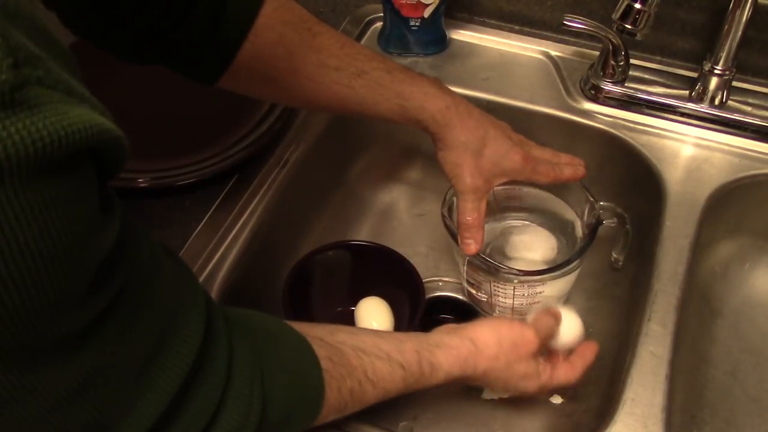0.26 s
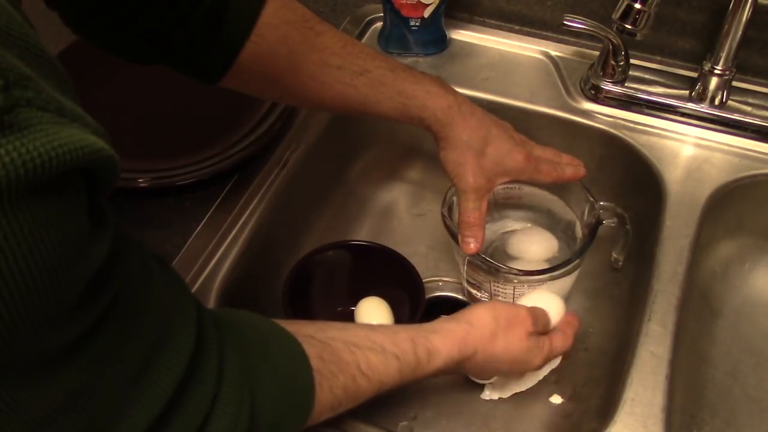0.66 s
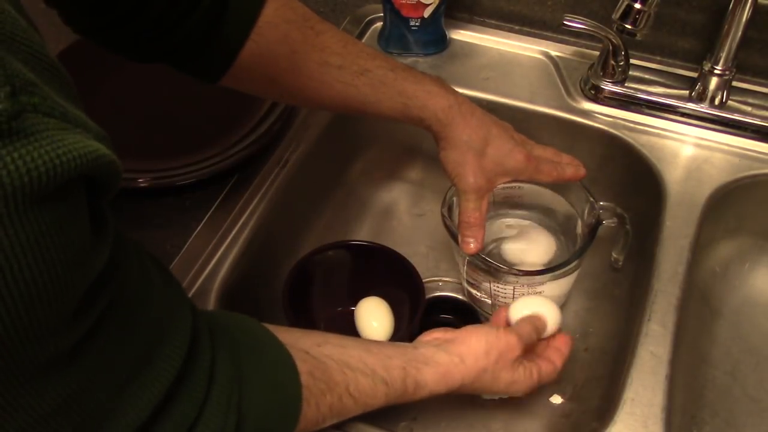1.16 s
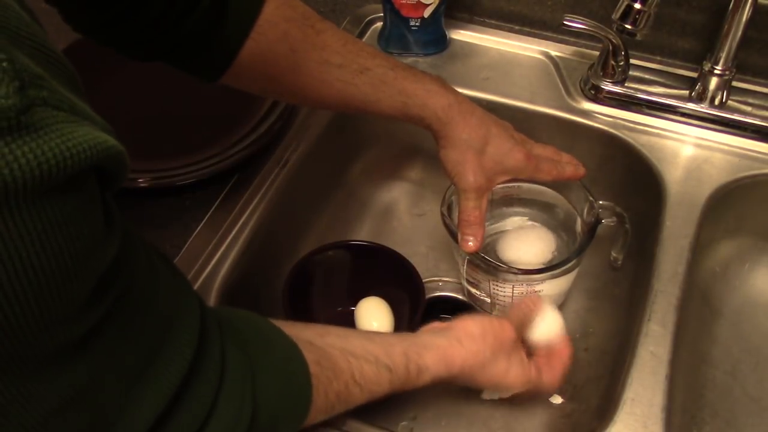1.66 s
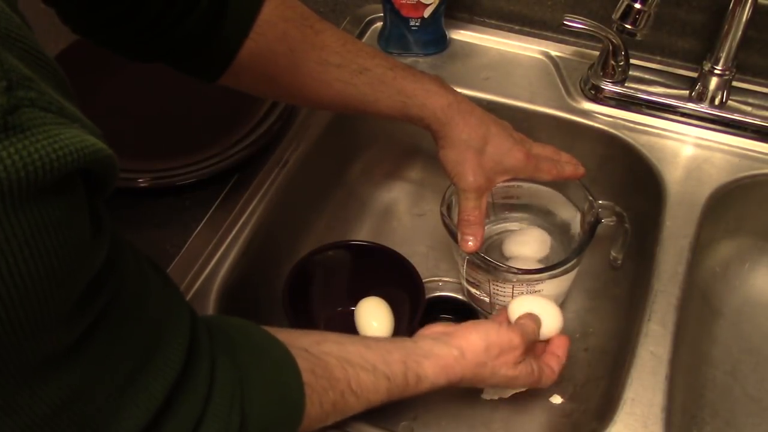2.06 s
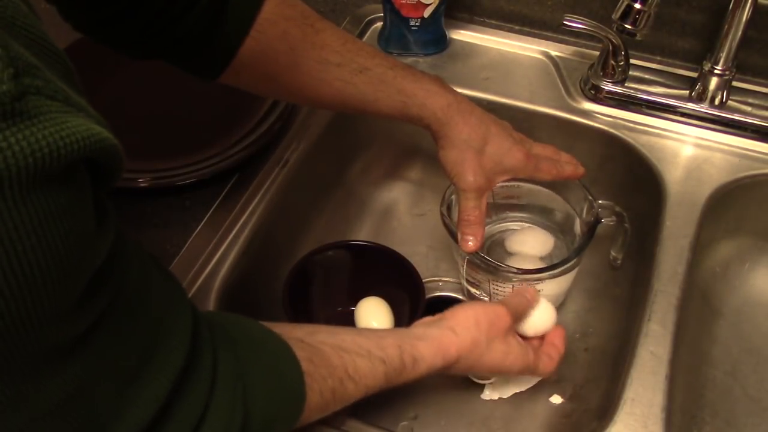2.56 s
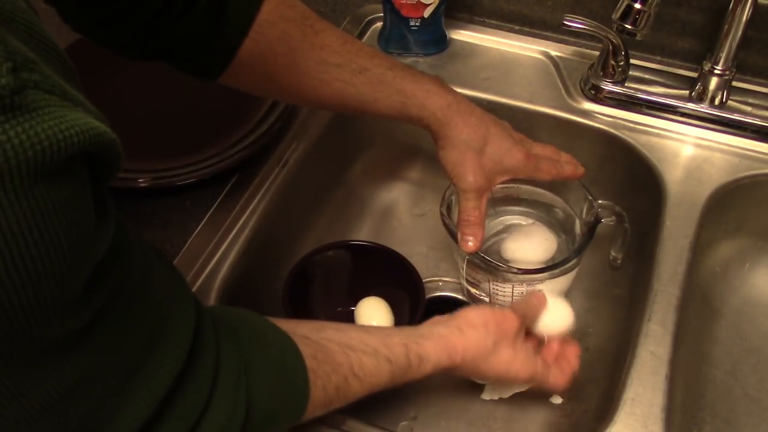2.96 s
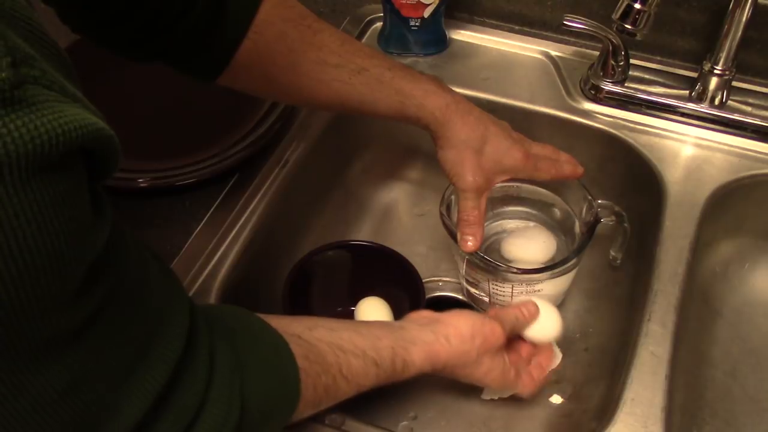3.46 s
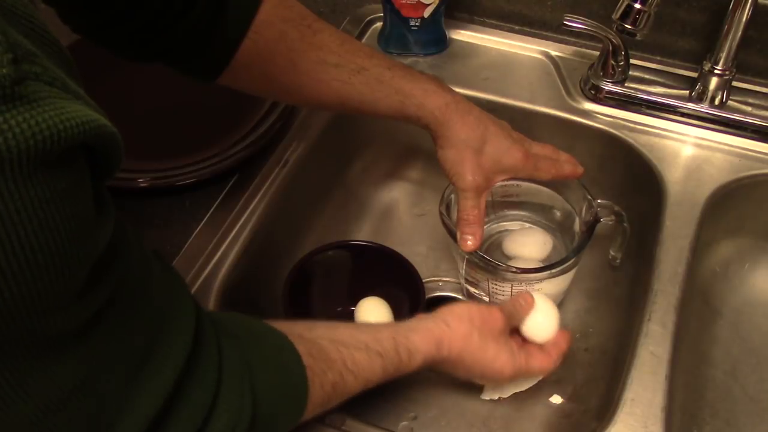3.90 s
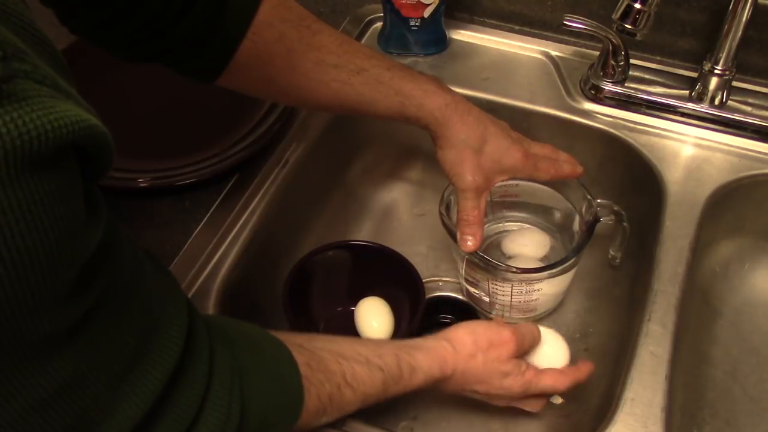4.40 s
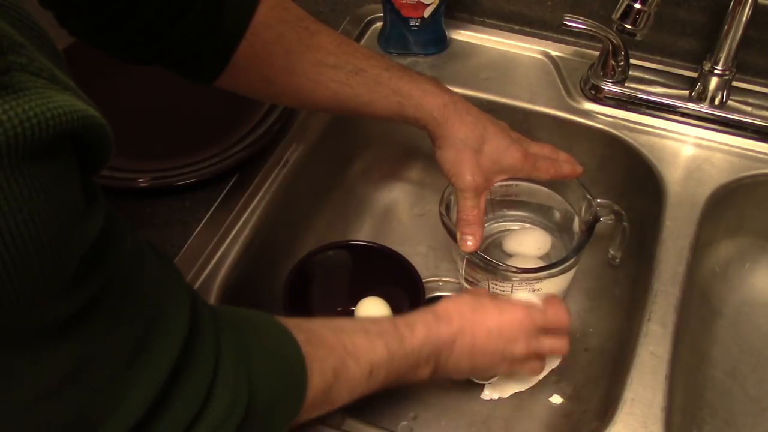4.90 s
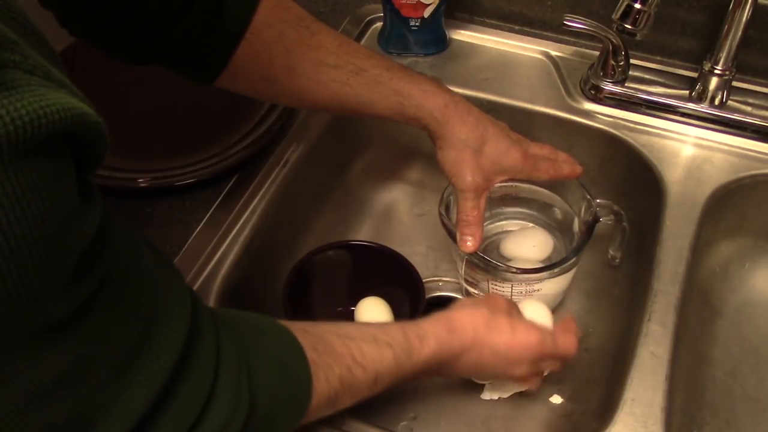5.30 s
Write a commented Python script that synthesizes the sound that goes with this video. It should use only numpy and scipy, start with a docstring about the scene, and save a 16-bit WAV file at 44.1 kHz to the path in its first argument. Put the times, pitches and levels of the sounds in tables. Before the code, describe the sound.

A hard-boiled egg is cracked on a steel sink, heard close in a quiet kitchen with soft low rumble and hush. At 0 s a sharp, bright shell crack lands with the heaviest low thud. More taps follow at about 0.2, 0.45, a quick double at 0.7, and 1.0 s, with tiny flakes snapping and soft pats near 0.9 s. After a short gap, crunchier taps come at 1.45, 1.65 and 1.85 s, with a clearer egg clack. Further taps fall at 2.35, 2.55, 2.9 and 3.15 s, then softer ones around 3.4 and 3.7 s, and firmer at 3.9 and 4.15 s. Each has a short dull metal knock and brief echo. From 4.2 to 4.9 s there are only faint bumps, crackle and ticks as fingers turn the egg. Two last crisp taps come at 4.9 and 5.2 s, then small flake snaps.

```python
"""A hard-boiled egg is tapped again and again on a steel kitchen sink: each blow is a burst of tiny fractures,
filtered to shell crack and egg clack, and the sink answers with a noise knock and damped modes.
Between taps, clumped fractures crackle as the fingers turn the egg and single flakes snap as short bursts.
A few soft pats sound as a decaying sine with a noise pat. Filtered noise makes the kitchen's hush,
and decaying noise makes the echoes of bowl and room."""
import sys
import numpy as np
from scipy import signal
from scipy.fft import rfft, irfft, next_fast_len
from scipy.io import wavfile

SR = 44100
rng = np.random.default_rng(int(sys.argv[2]) if len(sys.argv) > 2 else 0)


def unload_wav(signal):
    """Save mono or channel-first audio to the path in sys.argv[1] as 16-bit WAV at rate SR, clipped to [-1, 1]."""
    wavfile.write(
        sys.argv[1],
        SR,
        np.round(np.clip(np.atleast_2d(signal).T, -1, 1) * 32767).astype(np.int16),
    )


N = 244578

# All levels are relative: each source applies its own trim or normalisation.
# blows of the egg on the sink: (time [s], shell crack level [dB], flake pitch [Hz], egg clack level [dB],
#   sink thud level [dB], thud pitch of that spot [Hz], swell [s], crush decay constant [s])
EGG_TAPS = [(0.0015, -33, 7700, -49, -23, 142, 0.0031, .0024),
            (0.2125, -35.5, 5000, -51, -44, 97, 0.0087, .002),
            (0.445, -27.5, 6560, -39.5, -41.5, 91, 0.0037, 0.0072),
            (0.6998, -37, 6030, -46, -43.5, 129, 0.0026, 0.0075),
            (0.7165, -40, 7500, -58, -51, 130, 0.0036, .008),
            (0.978, -34.5, 4600, -47.5, -39, 91, 0.00086, 0.0025),
            (1.444, -26, 6300, -35.5, -38, 122, .0003, .008),
            (1.6384, -29.5, 6600, -33, -38.5, 97, 0.003, 0.0055),
            (1.838, -33.5, 5500, -36.5, -36.5, 100, 0.0051, 0.0051),
            (2.3437, -35.5, 7400, -39.5, -39, 99, 0.00043, 0.013),
            (2.54, -40, 7760, -42.5, -40, 94, 0.0028, .008),
            (2.9231, -34.5, 7200, -39, -41.5, 78, .0013, .013),
            (3.169, -32.5, 4870, -42, -39.5, 89, 0.0015, 0.0071),
            (3.391, -60.5, 5200, -60.5, -59, 137, .005, .007),
            (3.443, -43, 4400, -44, -46, 97, 0.0022, 0.0067),
            (3.708, -41.5, 6400, -42.5, -38.5, 93, 0.0047, 0.0019),
            (3.887, -33.5, 5800, -36.5, -40, 109, 0.0076, 0.0053),
            (4.1291, -37.5, 8200, -47.5, -44.5, 99, .004, 0.0089),
            (4.911, -34, 5760, -44.5, -35, 97, 0.0017, 0.0065),
            (5.1883, -31, 4400, -39, -36.5, 108, 0.0011, .014)]
# single flakes snapping, some during a tap, at set times: (time [s], peak level [dB])
FLAKE_SNAPS = [(0.0034, -12), (0.2189, -18), (0.4784, -33), (0.5656, -33), (0.6005, -39.5), (0.7761, -32.5),
               (0.8071, -31), (0.912, -39), (1.2815, -42), (1.5409, -34.5), (2.1126, -45), (2.3584, -21.5),
               (2.796, -31), (2.8734, -37.5), (4.2014, -37), (4.4737, -40), (5.3173, -37.5),
               (5.3587, -35.5)]
# soft dull pats and bumps at the sink: (time [s], level [dB], pitch [Hz], t60 [s])
SOFT_PATS = [(0.883, -37, 1070, 0.015), (0.9066, -36, 370, 0.029), (4.309, -46, 260, 0.028),
             (4.34, -43.5, 83, 0.089)]
# bending modes of the sink floor: (frequency [Hz], level [dB], t60 [s])
FLOOR_MODES = [(22.4, 26, 1), (54.9, 4, .5), (68.1, 0.5, 0.56), (91.7, -5, 0.37), (104.9, -4.5, 0.37),
               (129.8, -6.5, 0.31), (157.5, 3.5, 0.26), (188.3, 4.5, 0.26)]
# ringing modes of the steel bowl: (frequency [Hz], level [dB], t60 [s])
STEEL_MODES = [(381, -6, 0.5), (416.5, 0, 0.19), (597, 0.5, 0.36), (631.6, 3.5, 0.15), (899, 6.5, 0.34),
               (890, 0, 0.46), (1110, 1.5, 0.18), (1342, 1, 0.3), (1600, -11, 0.51), (1930, -1, 0.11),
               (2330, -28, .25), (2506, 10, 0.19), (2950, -9, 0.17), (4580, -6.5, 0.56), (4720, -11, 0.12)]
# spectrum of breaking shell: (frequency [Hz], level [dB])
SHELL_SPECTRUM = [(1500, -35), (2800, -11), (3700, -5.5), (4500, -1), (5500, 1), (6400, 1), (7800, -0.5),
                  (8900, -8.5), (11000, -7), (14000, -9), (16000, -15)]
# spectrum of the egg's clack: (frequency [Hz], level [dB])
EGG_SPECTRUM = [(150, -22.5), (450, -11.5), (640, -3), (780, 1.5), (1000, -3.5), (1250, -4), (1850, 2),
                (2120, -4.5), (2480, 7.5), (2900, -6), (3800, -2.5), (7000, -51)]
# spectrum of shell flexing in the fingers: (frequency [Hz], level [dB])
CRACKLE_SPECTRUM = [(800, -14.5), (2200, -2.5), (3500, -10), (5500, 2.5), (7200, 2.5), (9000, -9.5),
                    (13000, -12.5), (16000, -17)]
# spectrum of the kitchen's hush and rumble: (frequency [Hz], level [dB])
HUSH_SPECTRUM = [(20, 1.5), (60, -2), (120, -10.5), (250, -14.5), (400, -11), (650, -15), (1000, -22.5),
                 (2000, -27.5), (4000, -30.5), (7000, -32.5), (10000, -37), (16000, -41)]
# spectrum of the sink's dense knock: (frequency [Hz], level [dB])
KNOCK_SPECTRUM = [(90, -28.5), (170, 1.5), (280, -4.5), (380, 0), (480, -7), (630, 5), (760, -8),
                  (920, 2.5), (1250, -8.5), (2000, -8.5), (3500, -20.5)]
# decay of the kitchen's reverberation: (frequency [Hz], t60 [s])
KITCHEN_DECAY = [(100, 0.63), (500, 0.24), (1500, 0.32), (4000, 0.32), (8000, 0.23), (15000, 0.19)]
# the fingers squeeze and turn the egg: (start [s], length [s], crackle level [dB])
FINGER_TURNS = [(0.787, 0.033, -40), (1.209, 0.097, -68), (2.114, .19, -57.5), (2.443, .02, -52),
                (2.79, 0.065, -49.5), (3.39, .06, -66), (4.19, 0.24, -60.5), (4.471, 0.61, -53),
                (5.017, 0.12, -60.5), (5.27, 0.12, -56.5)]

TOP_HZ = 16000  # upper band limit
AGE = np.arange(SR * 3 // 4) / SR  # time since an event began [s]
CLACK_HZ, CLACK_SPREAD = 2390, 0.11  # the egg's own pitch, and its relative change with the grip
KNOCK_DB, KNOCK_FROM_THUD = -11.5, 0.49  # knock level is a blend of crack and thud: offset, share of thud
TURN_ATTACK_S, TURN_RELEASE_S, TURN_SAG_DB_PER_S = .01, 0.031, 8.5  # a squeeze builds, lets go, slackens
GRIP_DB = -68  # relative crackle level of the egg merely held
TICKS_PER_S, TICK_DB, TICK_SPREAD_DB = 9.8, 10, 6  # stray snaps: rate, offset from squeeze, +/- scatter


def amp(db):
    """Logarithmic level: 20 dB is a tenfold amplitude."""
    return 10 ** (np.asarray(db) / 20)


def unit(x):
    """Power normalisation: x scaled to rms 1."""
    return x / np.sqrt(np.mean(x ** 2) + 1e-20)


def blow(x):
    """Energy normalisation: x scaled to the energy of 20 ms at rms 1."""
    return x / np.sqrt(np.sum(x ** 2) / (.02 * SR) + 1e-20)


def along(points, hz):
    """Logarithmic frequency scale: interpolates (frequency [Hz], value) points."""
    f, v = np.transpose(points)
    return np.interp(np.log(hz + 1), np.log(f + 1), v)


def add(track, s, x):
    """Superposition: x is summed into the track from time s."""
    start = max(0, round(s * SR))
    track[start:start + len(x)] += x[:max(0, N - start)]


def coloured(x, spectrum):
    """Minimum-phase filtering: a folded cepstrum gives the spectrum a causal response."""
    m = 2 * next_fast_len(len(x))
    level_db = along(spectrum, np.fft.rfftfreq(m, 1 / SR))
    cepstrum = irfft(np.log(amp(level_db)))
    cepstrum[1:m // 2] *= 2
    cepstrum[m // 2 + 1:] = 0
    response = np.exp(rfft(cepstrum))
    return irfft(rfft(x, m) * response, m)[:len(x)]


def peaked(x, pitch_hz, width, boost_db):
    """Resonance: one band of x is lifted; width is a share of the pitch."""
    b, a = signal.iirpeak(pitch_hz, 1 / width, fs=SR)
    return x + amp(boost_db) * signal.lfilter(b, a, x)


def fractures(size, spiky_db):
    """Brittle fracture: dense tiny impulses, a few far larger than the rest."""
    strength_db = spiky_db * np.minimum(rng.standard_normal(size), 2)
    return unit(rng.standard_normal(size) * amp(strength_db))


def ringing(modes, scatter_db, detune, attack):
    """Modal decay: damped sines whose strengths and pitches shift with place and load of each blow."""
    hz, db, t60 = np.transpose(modes)[:, :, None]
    db = db + scatter_db * rng.standard_normal(hz.shape)
    hz = hz * (1 + detune * rng.standard_normal(hz.shape))
    phase = rng.uniform(0, 2 * np.pi, hz.shape)
    decay = np.exp(-np.log(1000) * AGE / t60)
    waves = amp(db) * decay * np.sin(2 * np.pi * hz * AGE + phase)
    return waves.sum(axis=0) * (1 - np.exp(-AGE / attack))


def echoes(x, bowl_db, bowl_t60, room_db, room_delay):
    """Reverberation: x convolved with decaying noise for the quick sink walls and the longer kitchen."""
    hz, t, z = signal.stft(rng.standard_normal(len(AGE)), SR, nperseg=256)
    fade = np.exp(-np.log(1000) * t / along(KITCHEN_DECAY, hz)[:, None])
    onset = 1 - np.exp(-(AGE / room_delay) ** 2)
    room = signal.istft(z * fade, SR)[1][:len(AGE)] * onset
    bowl = rng.standard_normal(len(AGE)) * np.exp(-np.log(1000) * AGE / bowl_t60)
    answer = amp(room_db) * room / np.linalg.norm(room) + amp(bowl_db) * bowl / np.linalg.norm(bowl)
    return x + signal.fftconvolve(x, answer)[:len(x)]


def room_tone():
    """Stationary noise: the steady hush and low rumble of the kitchen."""
    return amp(-61) * unit(coloured(rng.standard_normal(N), HUSH_SPECTRUM))


def squeeze():
    """Load envelope: a light grip plus attack, sagging hold and release for each turn, as a gain."""
    gain = np.full(N, amp(GRIP_DB))
    for s, length, db in FINGER_TURNS:
        attack = np.minimum(AGE / TURN_ATTACK_S, 1)
        release = np.exp(-np.maximum(AGE - length, 0) / TURN_RELEASE_S)
        add(gain, s, amp(db - TURN_SAG_DB_PER_S * AGE) * attack * release)
    return gain


def shell_handling():
    """Crackling noise: clustered fractures of the broken shell flexing between the fingers."""
    time = np.arange(N) / SR
    knots = np.arange(0, N / SR, .004)
    # the fractures come in clumps a few milliseconds long
    clumps_db = 5 * np.interp(time, knots, rng.standard_normal(len(knots)))
    grains = amp(clumps_db) * fractures(N, spiky_db=7)
    crackle = amp(-7) * squeeze() * unit(coloured(grains, CRACKLE_SPECTRUM))
    return echoes(crackle, bowl_db=-7.5, bowl_t60=0.016, room_db=-12.5, room_delay=.012)


def sink(knock_db, thud_db, spot_hz):
    """Impulse response of a plate: a dense knock, ringing steel and the thud of the sink's floor."""
    dense = rng.standard_normal(len(AGE)) * (np.exp(-AGE / 0.032) + 0.47 * np.exp(-AGE / 0.074))
    knock = amp(knock_db + 2.0) * blow(coloured(dense, KNOCK_SPECTRUM))
    steel = ringing(STEEL_MODES, scatter_db=2, detune=.001, attack=.004)
    ring = amp(knock_db - 2.0) * blow(steel)
    # each spot on the floor favours the bending modes near its own pitch
    spot = []
    for hz, db, t60 in FLOOR_MODES:
        octaves = np.log2(hz / spot_hz)
        spot.append((hz, db - 20 * np.sqrt(octaves ** 2 + 0.1), t60))
    thud = amp(thud_db - 2.5) * blow(ringing(spot, scatter_db=3.0, detune=0.01, attack=0.0062))
    return knock + ring + thud


def taps():
    """Impact with crushing: the shell gives way over milliseconds while the egg pushes the steel."""
    out = np.zeros(N)
    for s, crack_db, flake_hz, clack_db, thud_db, spot_hz, swell, crush in EGG_TAPS:
        # cracking starts abruptly at first touch, swells with the load and dies as the egg stops
        loading = np.interp(AGE, [0, swell], [.3, 1])
        force = loading * np.exp(-np.maximum(AGE - swell, 0) / crush)
        crack = coloured(force * fractures(len(AGE), spiky_db=8), SHELL_SPECTRUM)
        clack = coloured(force * fractures(len(AGE), spiky_db=3.0), EGG_SPECTRUM)
        # the size of the breaking flake and the angle of the egg colour each tap
        clack_hz = CLACK_HZ * np.exp(CLACK_SPREAD * rng.standard_normal())
        crack = peaked(crack, flake_hz, width=.15, boost_db=-5)
        clack = peaked(clack, clack_hz, width=0.1, boost_db=0)
        direct = amp(crack_db - 1.0) * blow(crack) + amp(clack_db - 2.5) * blow(clack)
        egg = echoes(direct, bowl_db=-6, bowl_t60=0.051, room_db=-11.5, room_delay=0.018)
        knock_db = KNOCK_DB + crack_db + KNOCK_FROM_THUD * (thud_db - crack_db)
        add(out, s, egg + sink(knock_db, thud_db, spot_hz))
    return out


def stray_snaps():
    """Random fracture under load: (time [s], peak level [dB]) of small snaps, louder when squeezed."""
    count = round(TICKS_PER_S * N / SR)
    chance = rng.random((count, 2))
    at = (chance[:, 0] * N).astype(int)
    scatter_db = TICK_SPREAD_DB * (2 * chance[:, 1] - 1)
    peak_db = 20 * np.log10(squeeze()[at]) + TICK_DB + scatter_db
    return list(zip(at / SR, peak_db))


def snaps():
    """Sudden release of strain: loosened flakes snap one by one as short fracture bursts."""
    out = np.zeros(N)
    age = AGE[:SR // 20]
    for s, peak_db in list(FLAKE_SNAPS) + stray_snaps():
        burst = coloured(fractures(len(age), spiky_db=5.5) * np.exp(-age / 0.0014), SHELL_SPECTRUM)
        add(out, s, amp(peak_db - 4.5) * burst / np.abs(burst).max())
    return echoes(out, bowl_db=-2.0, bowl_t60=0.019, room_db=-12.5, room_delay=0.0099)


def soft_pats():
    """Damped oscillation: each pat is dull noise and a few cycles of ring."""
    out = np.zeros(N)
    dull = [(150, -14), (400, 0), (1200, -2), (2200, -22), (4000, -45)]  # (frequency [Hz], level [dB])
    for s, db, hz, t60 in SOFT_PATS:
        noise = coloured(rng.standard_normal(len(AGE)), dull)
        pat = 0.38 * unit(noise) * np.exp(-AGE / 0.004)
        ring = np.sin(2 * np.pi * hz * AGE) * np.exp(-np.log(1000) * AGE / t60)
        add(out, s, amp(db - 0.5) * (ring + pat))
    return echoes(out, bowl_db=-18, bowl_t60=.06, room_db=-13, room_delay=.012)


def scene():
    """Superposition: everything at the sink, heard from one point."""
    return (room_tone() + shell_handling() + taps() + snaps() + soft_pats())[None]


def record(dry):
    """Band limitation: a very steep low-pass removes what lies above TOP_HZ."""
    m = next_fast_len(N + SR)
    hz = np.fft.rfftfreq(m, 1 / SR)
    lowpass = 1 / (1 + (hz / TOP_HZ) ** 120)
    return irfft(rfft(dry, m) * lowpass, m)[..., :N]


dry = scene()
out = record(dry)
unload_wav(out)
```